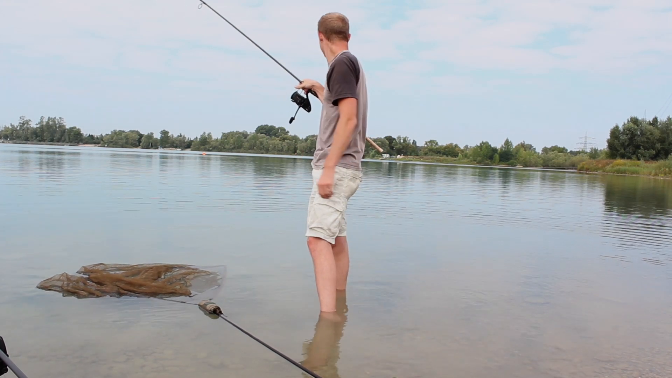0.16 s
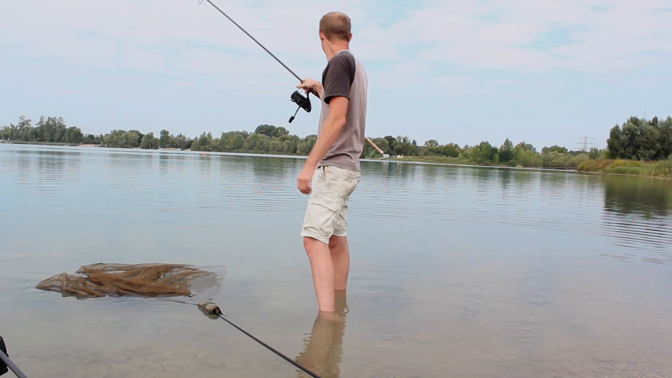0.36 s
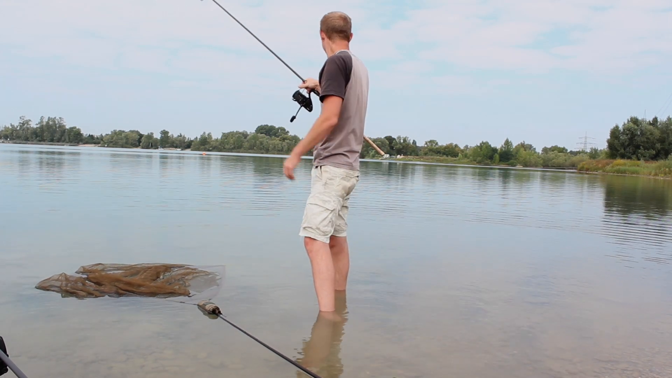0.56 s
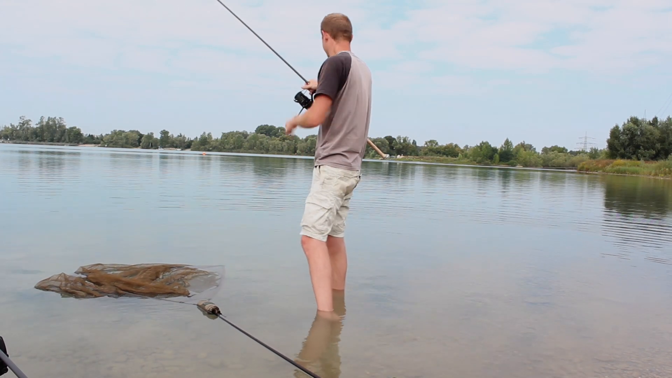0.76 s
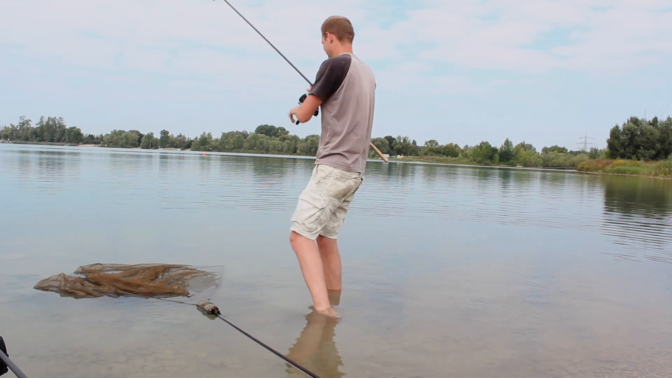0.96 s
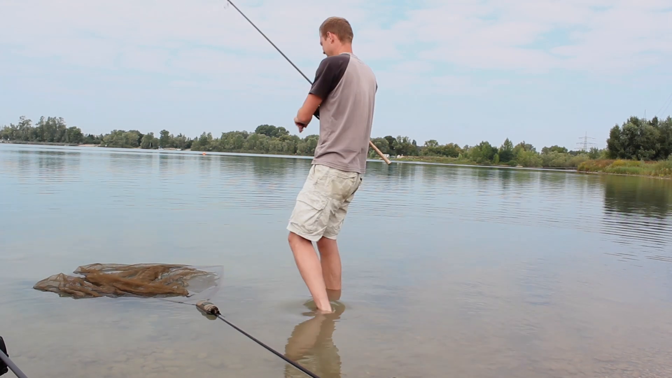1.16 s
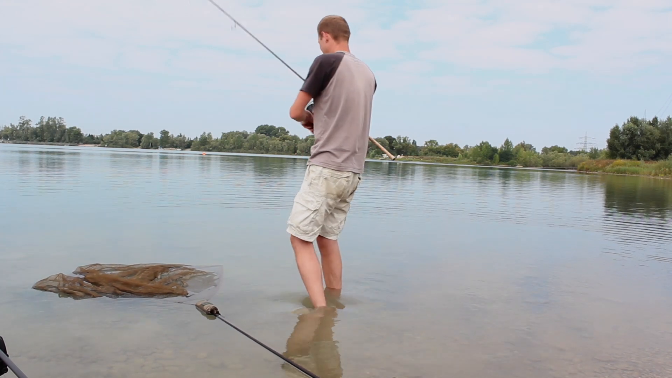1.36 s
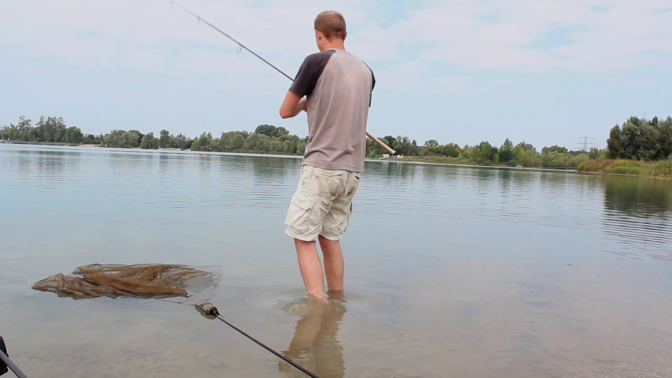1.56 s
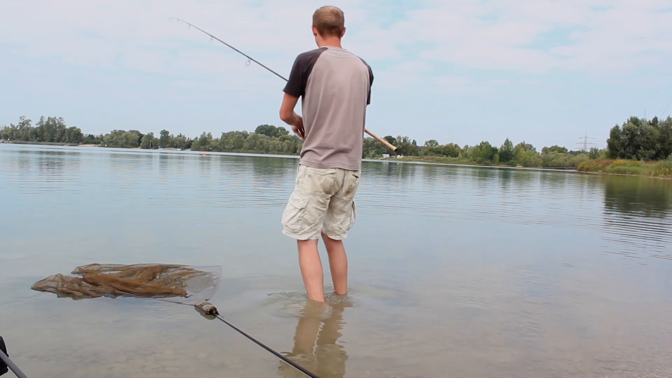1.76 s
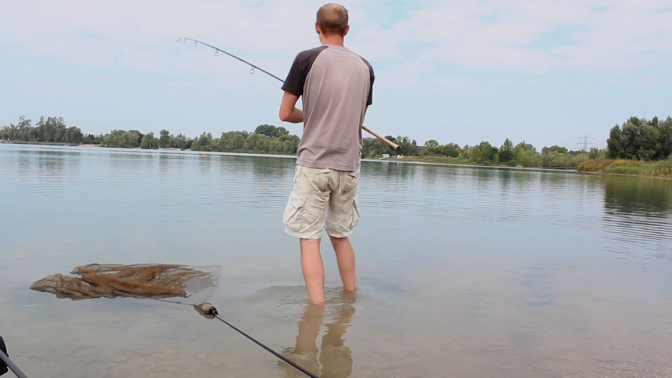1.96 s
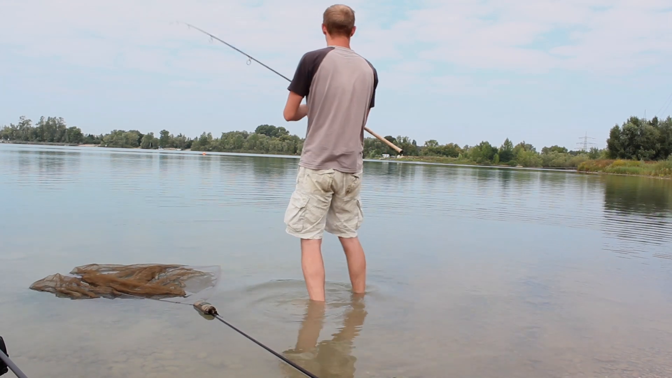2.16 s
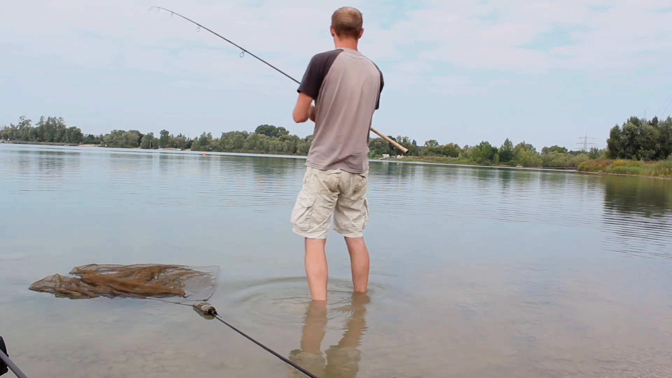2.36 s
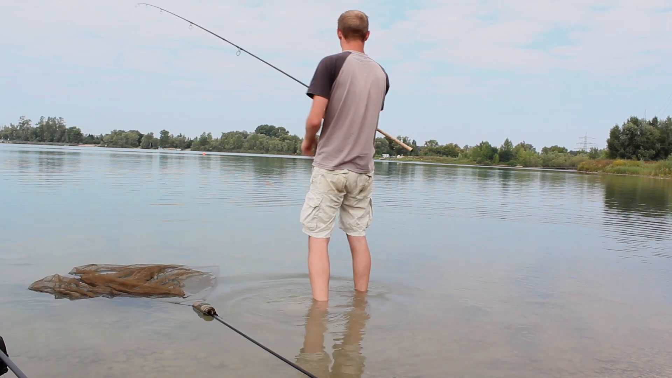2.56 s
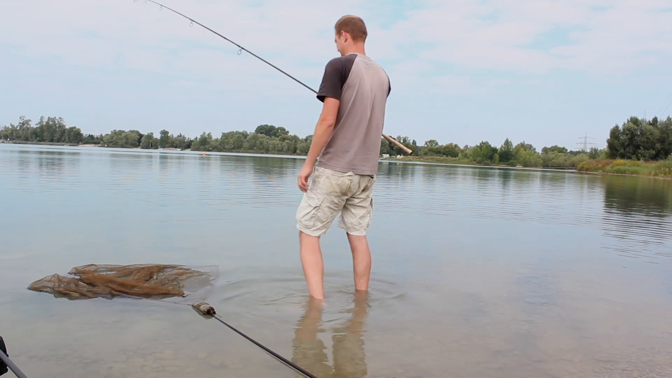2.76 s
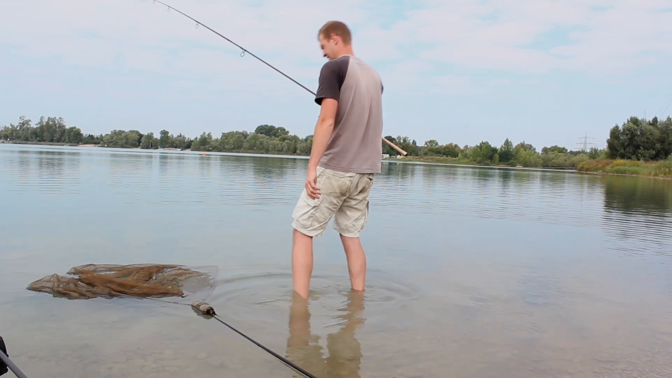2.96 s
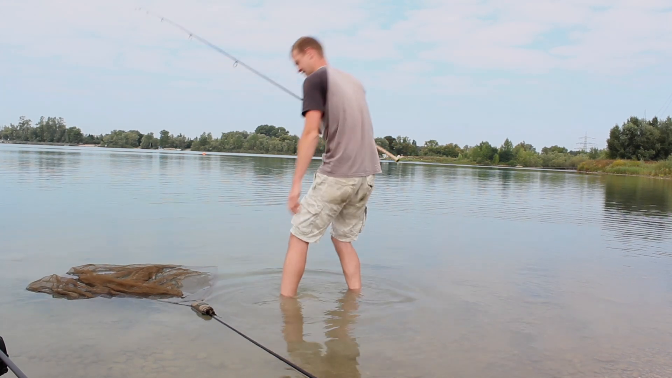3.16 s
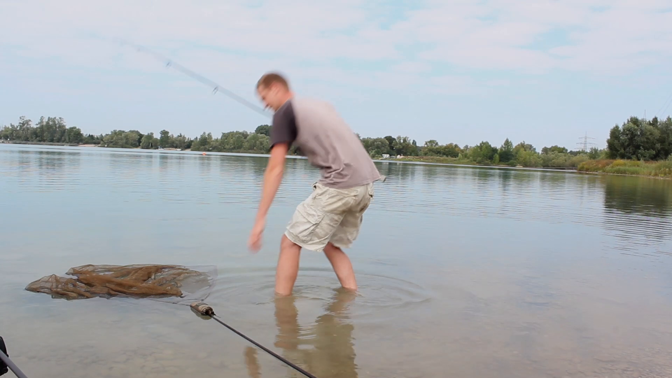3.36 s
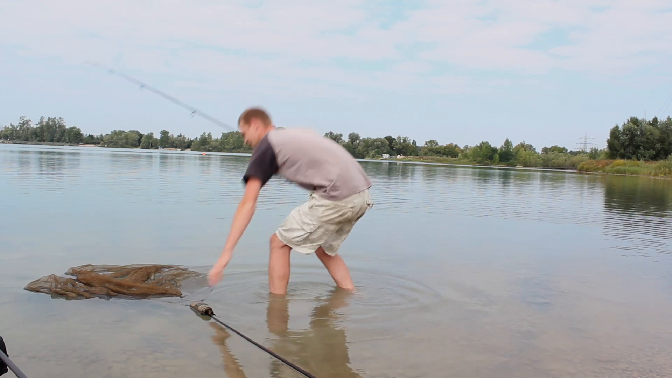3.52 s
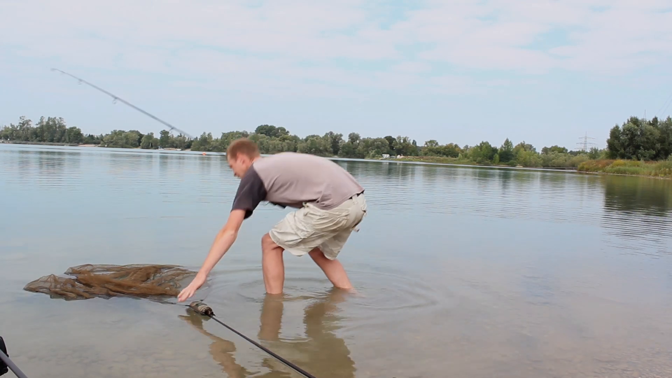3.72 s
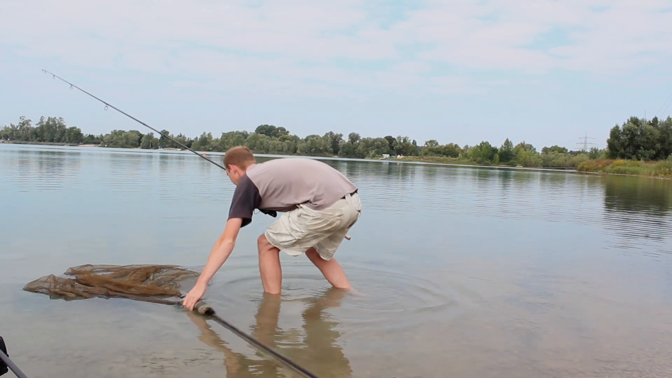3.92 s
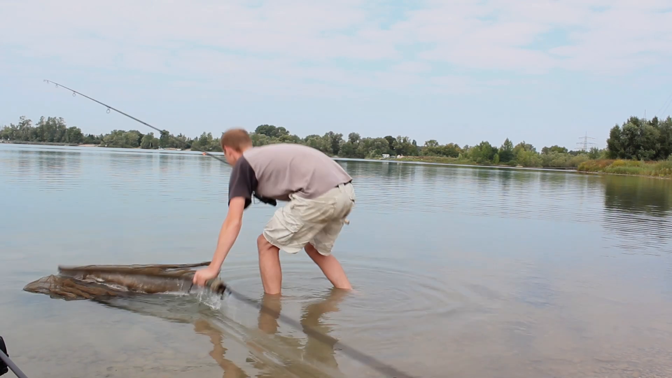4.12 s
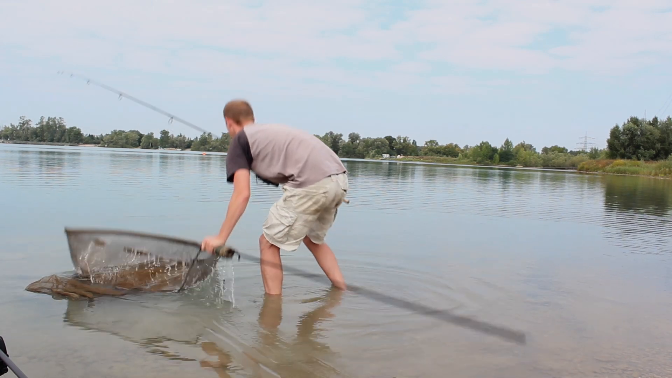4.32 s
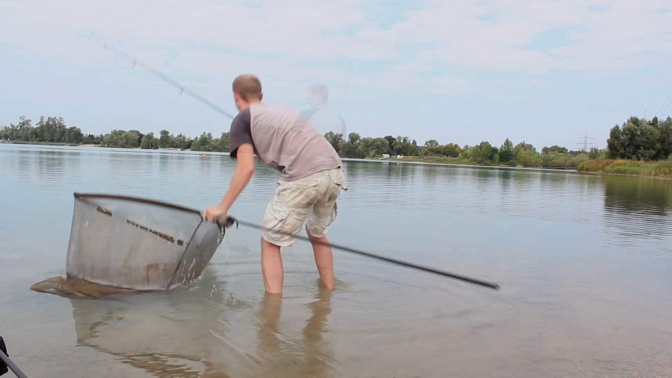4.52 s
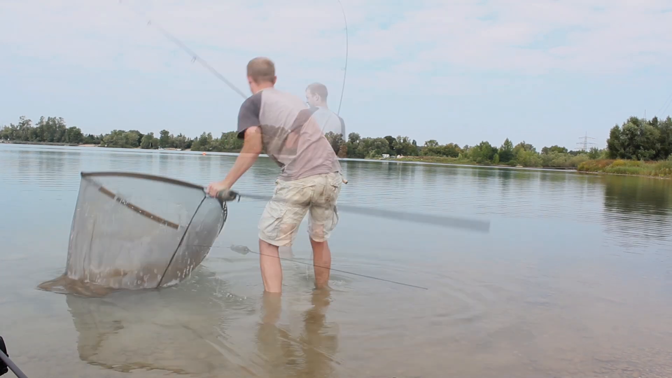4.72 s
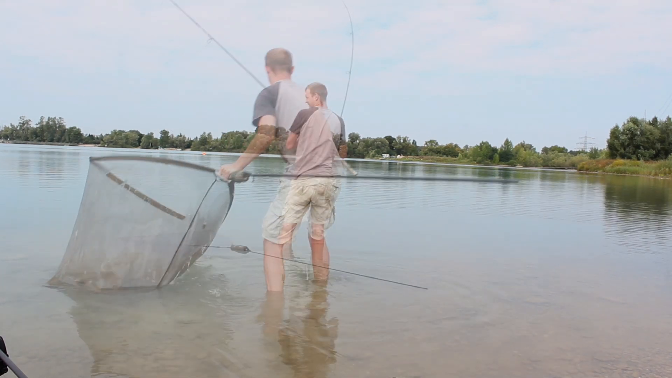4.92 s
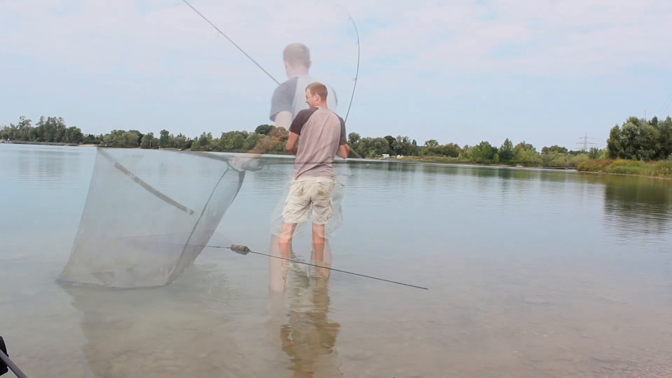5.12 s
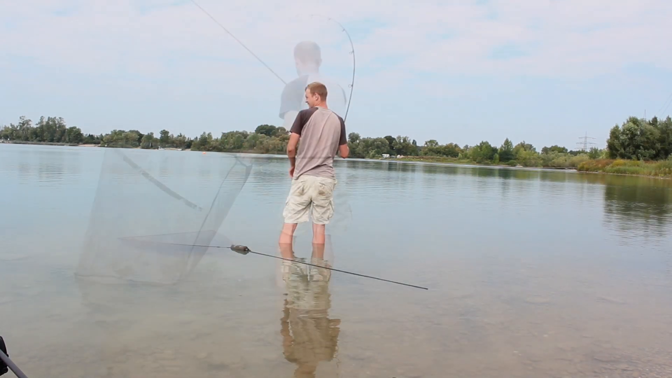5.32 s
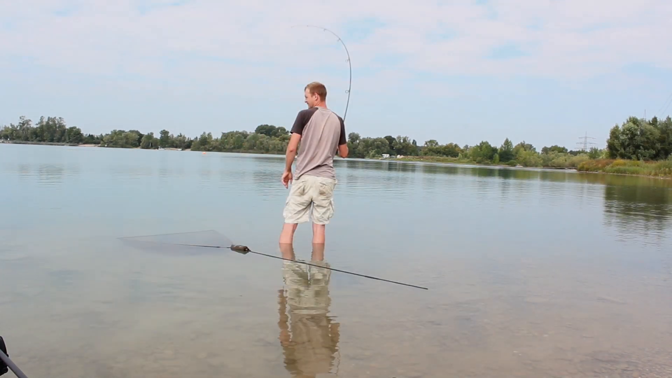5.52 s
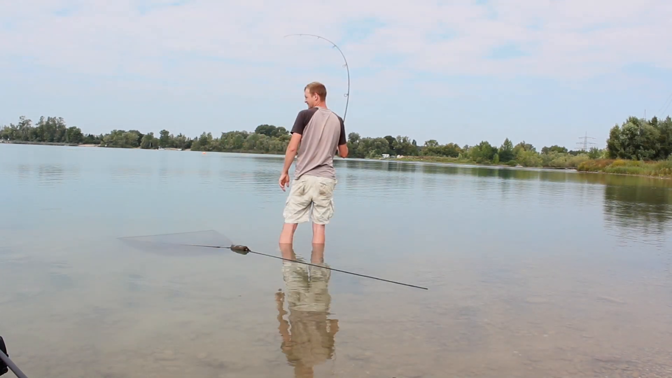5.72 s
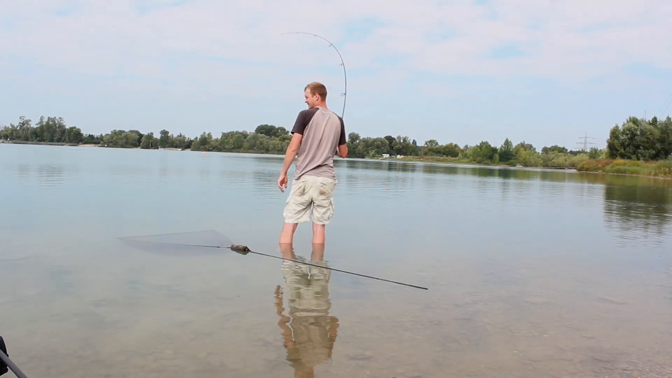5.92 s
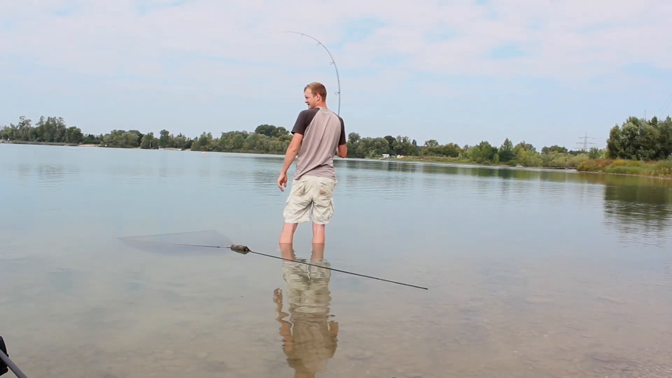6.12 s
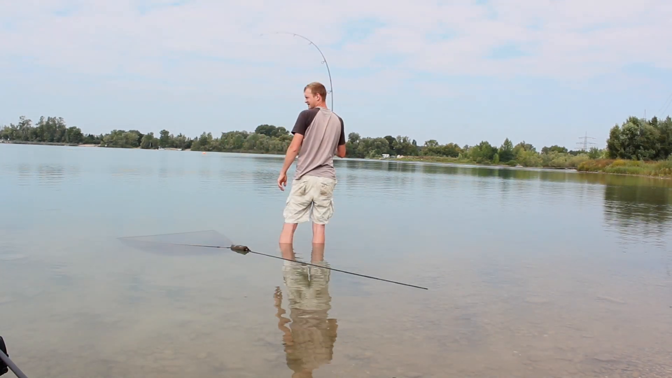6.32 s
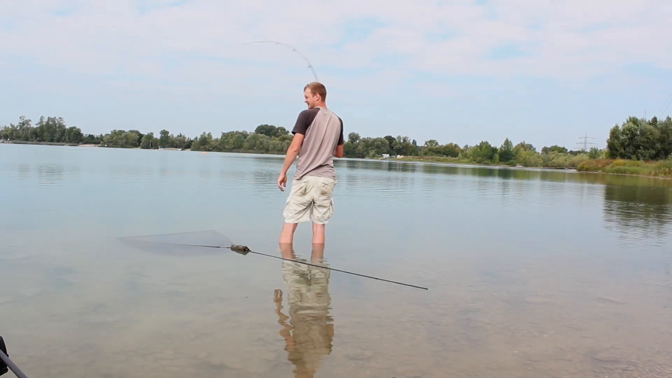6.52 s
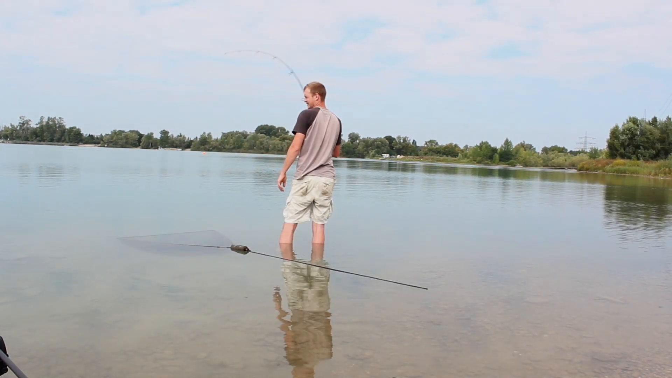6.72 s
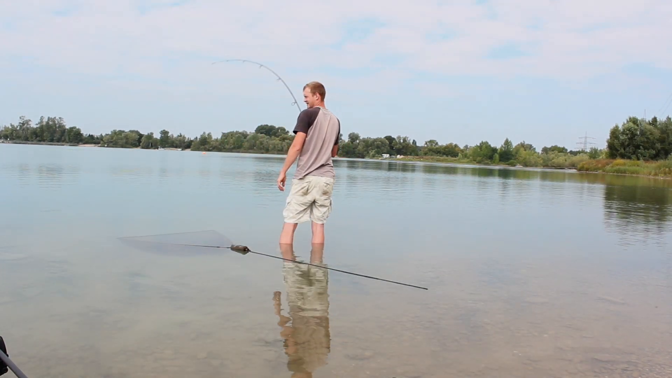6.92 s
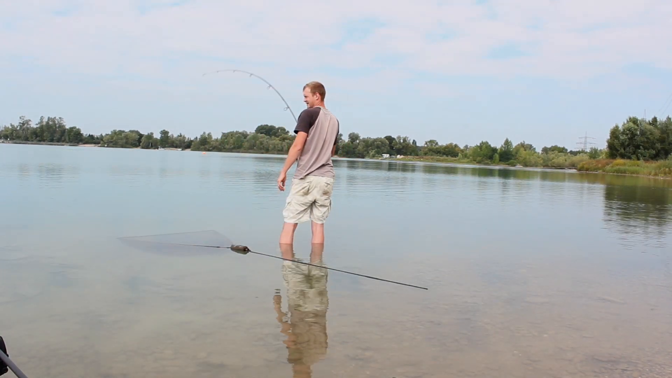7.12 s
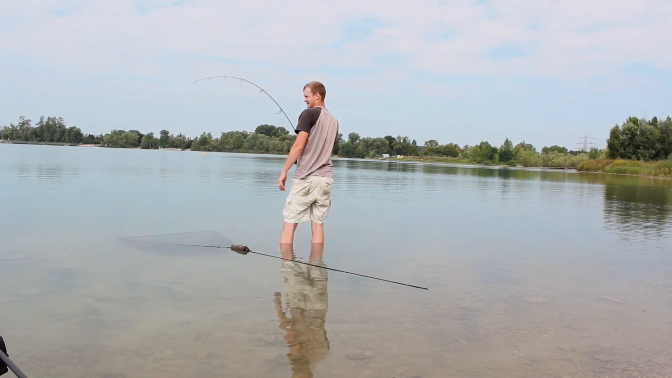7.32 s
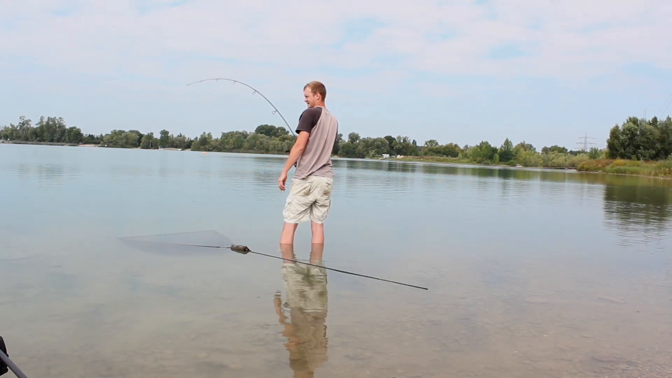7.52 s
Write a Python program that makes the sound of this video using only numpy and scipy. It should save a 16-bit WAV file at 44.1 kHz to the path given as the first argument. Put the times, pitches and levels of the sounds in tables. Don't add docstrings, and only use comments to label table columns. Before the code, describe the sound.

Quiet lakeside wading, gentle bubbly steps, a sudden popping splash as a net is pulled up, draining drips, then gusty wind and a last light step.

```python
import sys
import numpy as np
from scipy import signal
from scipy.io import wavfile
from scipy.ndimage import uniform_filter1d, minimum_filter1d

SR = 44100
rng = np.random.default_rng(int(sys.argv[2]) if len(sys.argv) > 2 else 0)


def persist_wave(psi):
    counts = np.round(np.clip(psi, -1, 1) * 32767).astype(np.int16)
    wavfile.write(sys.argv[1], SR, np.atleast_2d(counts).T)


def voltage_ratio(level):
    return 10 ** (np.asarray(level, float) / 20)


N = 338280


def evened(x):
    return x / np.sqrt(np.mean(x ** 2) + 1e-20)


def over_time(points):
    return np.interp(np.arange(N) / SR, *np.transpose(points))


def read(points, hz):
    f, value = np.transpose(points)
    return np.interp(np.log(hz + 1), np.log(f + 1), value)


def add(mix, s, sound):
    part = mix[round(s * SR):][:len(sound)]
    part += sound[:len(part)]


def noise(spectrum, size, patchy_db):
    real, imag, patches = rng.standard_normal((4 * N // size + 5, size // 2 + 1, 3)).T
    patches = uniform_filter1d(patches, size=8, axis=0)
    patches = evened(uniform_filter1d(patches, size=8, axis=1))
    level_db = read(spectrum, np.fft.rfftfreq(size, 1 / SR))[:, None] + patchy_db * patches
    spectra = (real + 1j * imag) * voltage_ratio(level_db)
    return evened(signal.istft(spectra, nperseg=size, noverlap=3 * size // 4)[1][:N])


def bubble(hz, db, t60_ms, glide, rise_ms):
    rise, t60 = max(rise_ms, 0.05) / 1000, max(t60_ms, 1) / 1000
    t = np.arange(0, rise + t60, 1 / SR)
    shake_hz = rng.uniform([60, 150], [150, 300])
    level_shake, pitch_shake = np.sin(2 * np.pi * (shake_hz * t[:, None] + rng.random(2))).T
    swell = np.sin(np.pi / 2 * np.minimum(t / rise, 1)) ** 2
    decay = voltage_ratio(db - 60 * np.maximum(t - rise, 0) / t60)
    pitch = hz * 2 ** (glide * t) * (1 + 0.018 * pitch_shake)
    pitch = np.minimum(pitch, 0.33 * SR)
    return swell * decay * voltage_ratio(2.0 * level_shake) * np.sin(2 * np.pi * np.cumsum(pitch) / SR)


def slap(db, hz, t60_ms, octaves):
    t = np.arange(round(min(t60_ms + 10, 90) * SR / 1000)) / SR
    foam = rng.standard_normal(len(t)) * voltage_ratio(1.5 - 60 * 1000 * t / t60_ms)
    front = 1.7 * bubble(1.63 * hz, db=0, t60_ms=2.66, glide=-300, rise_ms=0.186)
    add(foam, 0, front)
    band = 0.56 * hz * 2.0 ** np.array([-octaves, octaves])
    return voltage_ratio(db) * signal.lfilter(*signal.butter(3, band, "bandpass", fs=SR), foam)


def smack():
    # start in seconds, start pitch in Hz, peak in dB, t60 in ms, glide in octaves per s.
    modes = [
        (4.0265, 2600, 6.5, 2.2, -250),
        (4.0286, 3800, -16, 7, 0),
        (4.0294, 1820, 1.5, 5, -60),
        (4.0311, 980, -7.5, 14, 0),
        (4.0331, 1750, -9, 16, -90),
        (4.0358, 820, -11.5, 30, 20),
        (4.0392, 1050, -15, 48, 14),
        (4.0305, 590, -21, 24, 0),
    ]
    out = np.zeros(N)
    for i, (s, *mode) in enumerate(modes):
        add(out, s, bubble(*mode, rise_ms=1.45 if i else 0.13))
    return out


def foam_slaps():
    # start in seconds, peak in dB, reference pitch in Hz (the foam band centres at 0.56 times it, the
    # front rings at 1.63 times it), t60 in ms.
    slaps = [(3.857, -25, 5800, 11), (3.952, -20, 2560, 73), (3.9916, -18, 3300, 58),
             (4.0275, -14, 3400, 60), (4.232, -33, 4000, 28), (4.253, -27.5, 3660, 29),
             (4.39, -31, 4000, 20), (4.418, -24.5, 4530, 11.7), (4.458, -37, 2770, 21),
             (4.474, -38.5, 4000, 25), (6.225, -43.5, 2860, 340)]
    out = np.zeros(N)
    for s, *row in slaps:
        add(out, s, slap(*row, octaves=1.05))
    return out


def spray_ticks():
    # start in seconds, peak in dB, centre in Hz.
    ticks = [(1.7421, -47.5, 7150), (1.7458, -33, 9210), (3.1008, -33, 11100), (3.8564, -30, 9680),
             (3.8687, -23, 10200), (3.8757, -27, 8240), (4.0257, -14, 8200), (4.119, -25, 9490),
             (4.2544, -32, 9750), (4.3088, -33.5, 12700), (4.4605, -38, 10900), (4.4719, -28, 8770),
             (4.524, -35, 7030), (4.5717, -32, 8370), (4.635, -27, 12100), (4.8044, -29.5, 7030),
             (4.8221, -29, 12100), (4.8521, -32, 7810), (4.8905, -35.5, 8850), (6.2374, -33.5, 11800)]
    out = np.zeros(N)
    for s, db, hz in ticks:
        add(out, s + 0.00064, bubble(1.02 * hz, db - 0.5, t60_ms=1.55, glide=-78, rise_ms=0.048))
    return out


def air_pockets():
    # start in seconds, start pitch in Hz, peak in dB, t60 in ms, glide in octaves per s.
    pockets = [(1.376, 1193, -39, 120, -2.5), (1.401, 1037, -38, 90, -1.5), (1.454, 800, -39.5, 96, 7.5),
               (1.515, 913, -30.5, 47.4, 11), (1.81, 835, -44, 240, 9.5), (2.174, 460, -46, 250, 11.5),
               (3.063, 656, -37.5, 150, -3.5), (3.158, 613, -39.5, 83, 9), (3.199, 724, -39.5, 143, 11),
               (3.341, 2740, -41, 13.4, -30), (3.169, 2500, -40, 40, 55), (3.876, 480, -35, 56, -1.5),
               (3.887, 1700, -35.5, 86, 3), (3.909, 2510, -18, 27.8, 1.5), (4.0162, 2920, -35, 50, 25),
               (4.178, 539, -33, 140, 21.5), (4.197, 725, -27.5, 100, 18.5), (4.39, 1232, -34, 62, 0.5),
               (4.5, 1400, -29, 38, 10.5), (4.551, 1173, -37, 110, 8), (4.763, 1057, -32.5, 32, 10.5),
               (4.789, 390, -38, 145, 17), (4.9, 950, -34.5, 60, 15.5), (4.715, 1546, -38, 65, 2.5),
               (4.98, 949, -40.5, 81, 0), (5.208, 716, -45, 88, 7), (6.319, 830, -39, 130, 8),
               (4.253, 1080, -36.5, 60, 5), (6.532, 1082, -42.5, 80, -6), (6.612, 974, -43, 140, 6),
               (7.078, 1000, -42, 74, 27)]
    out = np.zeros(N)
    for s, hz, db, t60_ms, glide in pockets:
        add(out, s, bubble(hz, db, t60_ms, glide, rise_ms=0.206 + 0.04 * t60_ms))
    return out


def small_bubbles():
    # start in seconds, start pitch in Hz, peak in dB, t60 in ms, glide in octaves per s.
    leg_pings = [(1.1908, 2300, -39.5, 12, -34.5), (1.3633, 4390, -44, 8, 103),
                 (1.386, 1284, -41, 70, -19.5), (1.396, 4540, -41, 8, 50), (1.416, 5143, -30.5, 12, 35),
                 (1.4235, 2460, -40, 8, 100), (1.4367, 4700, -42, 8, -200), (1.4466, 2220, -31, 25, -21),
                 (1.4476, 2920, -39, 8, 0), (1.4577, 2080, -39.5, 24, 58), (1.4588, 4270, -48, 76, -23),
                 (1.483, 1870, -35, 44, -12), (1.4844, 5030, -41.5, 15.2, -71),
                 (1.5139, 4540, -44, 14, -36), (1.5259, 2010, -36, 24, 29.5), (1.5262, 1530, -44, 24, 17),
                 (1.5309, 3340, -43, 14, 57), (1.5517, 3350, -37.5, 8, -200), (1.5531, 2630, -30.5, 14, 58),
                 (1.5782, 6620, -43, 8, 0), (1.6003, 1810, -37, 42.6, 2), (1.6099, 1750, -42, 24, 0.5),
                 (1.6107, 3700, -35, 8, -125), (1.6218, 3230, -45, 24, 17), (1.6316, 3700, -39.5, 15, -71),
                 (1.6381, 1546, -34, 13.2, -114), (1.6653, 3580, -44, 24, -21), (1.6759, 2920, -39, 8, 175),
                 (1.6969, 1920, -36, 7, 98), (1.8337, 4100, -45, 14, 29), (1.8626, 4240, -41, 8, 50),
                 (1.884, 3460, -42, 8.7, -125), (1.9326, 1560, -34.5, 38, 9.5),
                 (1.9696, 4100, -41.5, 8, 102), (2.0881, 2632, -39.5, 40, -13), (2.1743, 5230, -33, 7.1, 0),
                 (2.1749, 3570, -30.5, 10, -1), (2.1939, 3960, -42, 8, -1), (2.2327, 2296, -42.5, 24, 0.5)]
    net_pings = [(3.9518, 1320, -24.5, 14.7, -72.5), (3.9515, 3000, -27, 8, -200),
                 (3.9519, 3970, -20, 6.5, 0), (3.9548, 2310, -29, 8, 400), (3.9904, 2080, -31, 36, 57),
                 (3.9907, 3200, -26, 23, 91), (3.9902, 4720, -25.5, 6.7, -125),
                 (3.9914, 1525, -30, 40, 52.5), (4.073, 1380, -21, 7.3, 100), (4.0831, 1640, -30.5, 40, 8),
                 (4.0919, 3120, -24.5, 6.8, 0), (4.178, 3960, -36, 24, 0), (4.1841, 1690, -38.5, 70, 21),
                 (4.2198, 3120, -36, 14, -71), (4.2273, 2460, -44, 70, 30.5), (4.2314, 3700, -34, 8, 100),
                 (4.2314, 5570, -35, 8, 0), (4.2521, 3230, -27.5, 8, -200), (4.2521, 5420, -31, 7.5, 50),
                 (4.2552, 4100, -29, 8, 175), (4.2727, 2460, -37, 30.5, -43.5),
                 (4.2776, 6600, -39, 8, -125), (4.2851, 4240, -35, 8, -200), (4.3195, 1580, -31, 6.7, 400),
                 (4.3402, 3340, -34, 14, -36), (4.3522, 4070, -39, 12, -114), (4.3731, 3340, -36, 8, 100),
                 (4.3892, 5530, -36, 8, 50), (4.3894, 2640, -31, 8, 0), (4.4021, 5380, -41.5, 40, -40),
                 (4.4048, 2980, -19.5, 7.4, -200), (4.4062, 3927, -32, 44, -28),
                 (4.4083, 5200, -37, 14, -36), (4.4177, 2360, -31, 7.3, 400), (4.4178, 3800, -25, 8, 0),
                 (4.418, 5200, -26, 8, -125), (4.4501, 2730, -46.5, 110, -8)]
    drain_pings = [(4.4553, 2194, -34.5, 75, 44.5), (4.4592, 3120, -35, 8, 100),
                   (4.4711, 2740, -32, 22, -65), (4.4717, 5170, -34, 14, -71), (4.4724, 6610, -29, 8, -200),
                   (4.4759, 3830, -29.5, 8, -62), (4.4997, 1370, -28, 24, 19), (4.5002, 3580, -35, 8, 98),
                   (4.506, 2520, -31, 14, 0), (4.5243, 6600, -28.5, 8, -64), (4.525, 3700, -37, 8, 400),
                   (4.5428, 3070, -36, 40, -24), (4.5527, 5090, -41, 42, -39), (4.5537, 2160, -35, 28, 90),
                   (4.555, 2950, -20.5, 13, -40), (4.5609, 5030, -35, 24, -21),
                   (4.5735, 3020, -42.5, 40, 19), (4.5871, 3030, -27, 7.4, -62),
                   (4.6625, 3460, -33.5, 14, -36), (4.6973, 3580, -35.5, 14, -114),
                   (4.7383, 2380, -32, 13.2, 157), (4.7633, 1796, -32.5, 14, -36),
                   (4.7772, 2920, -33, 16.7, 29), (4.7986, 2300, -29, 6.1, 175), (4.818, 4700, -31.5, 8, 0),
                   (4.818, 6400, -29, 8, -125), (4.8306, 5030, -35.5, 8, -200),
                   (4.8354, 3100, -34, 24, 13.5), (4.8565, 3120, -34, 8, 175),
                   (4.8565, 4700, -28.5, 7.3, -125), (4.8905, 4240, -37, 14, -114),
                   (4.8912, 3160, -35, 18, -71), (4.9694, 1530, -43, 37, 2), (4.9694, 3700, -42, 8, 50),
                   (4.9997, 4240, -35.5, 15.9, -71), (5.0173, 3820, -41.5, 26, -19.5),
                   (5.0367, 3700, -41, 8, 400), (5.0527, 3700, -43, 14, -36), (5.098, 1530, -35, 13, -114),
                   (5.118, 2110, -41.5, 14, -20), (5.1595, 3400, -35, 9, 175)]
    scattered_pings = [(2.9973, 3784, -44.5, 15, -36), (3.0952, 3830, -41, 7.4, 0), (3.101, 3040, -36, 8.8, -62),
                       (3.1146, 1880, -45, 40, 10), (3.1497, 2135, -45.5, 40, -11), (3.1568, 3120, -41, 8, -125),
                       (3.1639, 4100, -49, 24, -67), (3.1656, 2700, -32, 7.2, 0), (3.166, 5380, -38.5, 24, -21),
                       (3.1772, 3120, -46.5, 14, 157), (3.198, 3580, -39.5, 14, 0), (3.198, 4700, -43, 8, 50),
                       (3.2364, 3120, -42, 14, -71), (3.3476, 2370, -40.5, 40, -0.5),
                       (6.2194, 2715, -49.5, 40, 39), (6.2214, 5380, -48.5, 24, -20),
                       (6.2218, 3470, -44.5, 14, 29), (6.2299, 2820, -45, 24, -42), (6.2361, 2380, -39, 24, 17),
                       (6.2378, 6600, -45, 8, 0), (6.2439, 2380, -34, 36, 19), (6.2439, 5200, -37, 14, 29),
                       (6.2446, 3200, -44, 36, 12), (6.2531, 3020, -35, 14, 29), (6.2537, 1570, -45, 24, 33),
                       (6.2622, 2080, -39, 7.7, 50), (6.4235, 2080, -45, 60, -8),
                       (6.518, 2540, -33.5, 25.8, -40), (6.5279, 1630, -40, 14, -114),
                       (6.582, 3900, -44.5, 40, -50), (6.6599, 3120, -41, 16, -114),
                       (6.6612, 1294, -46.5, 110, -5.5), (6.9415, 3580, -47.5, 24, -21),
                       (6.9609, 2804, -47.5, 65, -8), (7.0435, 2380, -45, 44, -10.5),
                       (7.0466, 4000, -49, 120, -15), (7.0558, 2460, -41, 13, 29),
                       (7.0595, 3353, -44, 45, -42.5), (7.1207, 4390, -44.5, 8, 50), (7.135, 2640, -44, 24, 0),
                       (1.7452, 2890, -46.5, 14, 157), (1.8113, 3640, -47.5, 24, -43.5),
                   (1.8816, 2130, -47.5, 40, 20), (1.918, 4800, -47.5, 14, -36),
                   (2.0721, 1990, -46, 24, 15), (2.0728, 4640, -49, 24, -22),
                   (3.2429, 4340, -47.5, 14, -114), (3.2571, 2280, -44, 14, 29), (6.28, 4060, -50, 24, -21),
                   (6.2984, 3660, -48, 14, 29), (6.3715, 1997, -49.5, 75, 6), (6.4001, 2700, -45, 24, -21),
                   (6.4895, 3410, -48, 14, -71), (6.5926, 2360, -48, 40, -25.5),
                   (6.6208, 5500, -49, 14, 29), (6.7337, 3200, -52, 40, 1), (6.7636, 2360, -43, 15, 57),
                   (6.8327, 3310, -49, 24, 0), (6.899, 3200, -47.5, 15, 28.5), (6.9884, 4490, -51, 14, -36),
                   (7.0003, 2800, -45, 14, -73), (7.2768, 4340, -49, 15, -114)]
    out = np.zeros(N)
    for s, hz, db, t60_ms, glide in leg_pings + net_pings + drain_pings + scattered_pings:
        rise_ms = 0.206 + 0.0935 * t60_ms
        add(out, s, bubble(hz, db, t60_ms, glide, rise_ms))
        add(out, s, slap(db - 3.5, 1.55 * hz, t60_ms=43, octaves=0.446))
    return out


def stirred(column):
    # time in seconds, force in dB, depth from 0 (spray) to 1 (deep gurgle).
    movements = [
        [(0, -63.5, 1), (.35, -62.5, 0.23), (.6, -70, 1)],
        [(1.1, -66, .1), (1.35, -55.5, 0.56), (1.65, -52.5, 0.66), (1.95, -56.5, 0.58), (2.35, -66.5, 0.3)],
        [(2.95, -65.5, 1), (3.19, -58.5, 0.87), (3.4, -58, .6)],
        [(3.8, -50, 0.1), (3.95, -48.5, 0.6), (4.1, -44, 0.73), (4.24, -46, 0.31), (4.48, -42, 0.23),
         (4.62, -43, 0.66), (4.84, -44.5, 0.63), (5.12, -56.5, 0.59), (5.35, -57.5, 0.5)],
        [(6.15, -73, 0.2), (6.26, -52, 0.4), (6.34, -60.5, 0.69), (6.6, -56.5, 0.55), (6.8, -66, 0.6),
         (7.03, -56, 0.5), (7.25, -72.5, 0.45)],
    ]
    # level in dB at middle force and depth, dB per dB of force, dB over the whole depth.
    answers = [
        (-58.5, 1.0883, 21.5),
        (-58, 1.08, -5.5),
        (-66, 0.53, -12),
        (-66, 1.38, 0),
        (-61.5, 0.68, -13.5),
    ]
    middle_db, slope, depth_db = answers[column]
    gain, t = np.zeros(N), np.arange(N) / SR
    for rows in movements:
        s, force_db, depth = np.transpose(rows)
        db = middle_db + slope * (force_db + 55) + depth_db * (depth - 0.5)
        inside = (t > s[0]) & (t < s[-1])
        gain[inside] = voltage_ratio(np.interp(t[inside], s, db)) * signal.windows.tukey(inside.sum(), 0.1)
    return gain


def swarm(column, spread_db):
    # lowest pitch in Hz, highest pitch in Hz, ring in cycles, bubbles per s.
    swarms = [
        (433, 1716, 9, 1300),
        (1400, 5500, 10.97, 1700),
        (4870, 14500, 2.1, 1500),
    ]
    low_hz, high_hz, cycles, per_s = swarms[column]
    strength = voltage_ratio(spread_db * np.minimum(rng.exponential(1, N), 4))
    strength *= rng.random(N) < per_s / SR
    kind, out = rng.integers(0, 14, N), np.zeros(N)
    for k, hz in enumerate(np.geomspace(low_hz, high_hz, 14)):
        ring_ms = 1000 * cycles * rng.uniform(1, 4.7) / hz
        ring = bubble(hz, 0, ring_ms, glide=300 / ring_ms, rise_ms=0.0552 * ring_ms)
        ring = evened(ring) / np.sqrt(ring_ms)
        ring *= np.sin(np.pi * (k + 1.8) / 17)
        out += signal.oaconvolve(strength * (kind == k), ring)[:N]
    return evened(out) * stirred(column)


def draining_sheet():
    # frequency in Hz, level in dB per Hz.
    sheet = [(200, -35), (400, 10), (900, -10), (1800, 0), (3500, -1), (6000, -12.5), (10000, -20)]
    return stirred(column=3) * noise(sheet, size=512, patchy_db=5.0)


def droplets():
    drops_per_s = 220
    strength = voltage_ratio(3.0 * np.minimum(rng.exponential(1, N), 3))
    strength *= rng.random(N) < drops_per_s / SR
    kind, out = rng.integers(0, 8, N), np.zeros(N)
    for k, hz in enumerate(np.geomspace(3200, 15000, 8)):
        splat = slap(0, hz, t60_ms=8, octaves=0.35)
        out += signal.oaconvolve(strength * (kind == k), splat)[:N]
    return evened(out) * stirred(column=4)


def water():
    placed = smack() + foam_slaps() + spray_ticks() + air_pockets() + small_bubbles()
    swarms = swarm(column=0, spread_db=2.5) + swarm(column=1, spread_db=3.5) + swarm(column=2, spread_db=2.0)
    return placed + swarms + draining_sheet() + droplets()


def wind():
    # time in seconds, gust level in dB.
    gusts = [(0, -42.5), (.06, -65), (3.57, -52), (4.1, -69), (4.68, -49), (4.93, -43), (5.3, -38.5),
             (5.98, -47), (6.39, -42), (6.56, -41.5), (6.75, -43), (6.93, -45.5), (7.0, -41.5), (7.2, -39),
             (7.3, -49), (7.37, -42), (7.62, -44), (7.67, -36)]
    # frequency in Hz, level in dB per Hz.
    buffeting = [(3, 4), (8, 10), (30, 0), (70, -0.5), (110, -9), (200, -21), (350, -35), (600, -57.5)]
    return noise(buffeting, size=2048, patchy_db=2.0) * voltage_ratio(6.0 + over_time(gusts))


def second_take():
    dissolve = [4.54, 5.44]
    return np.interp(np.arange(N) / SR, dissolve, [0, 1])


def road_wash():
    # frequency in Hz, level in dB per Hz.
    wash = [(45, -25), (70, -26), (120, -5.5), (200, -8), (350, -12), (520, -19), (1000, -14.5),
            (1400, -20), (1950, -28.5), (4000, -35), (6000, -43.5)]
    return voltage_ratio(-48.5) * noise(wash, size=1024, patchy_db=1.43)


def engine():
    # time in seconds, firing rate in Hz.
    firing = [(0, 56.53), (2, 58.75), (3.5, 59.72), (4.3, 54.4), (5.5, 55.3)]
    order_db = [-54, -59]
    turns = np.cumsum(over_time(firing)) / SR
    out = np.zeros(N)
    for order, db in enumerate(order_db, 1):
        out += voltage_ratio(db) * np.sin(2 * np.pi * order * turns)
    return (1 - second_take()) * out


def mains_hum():
    return voltage_ratio(-25) * np.cos(2 * np.pi * 49.984 * np.arange(N) / SR)


def amplifier_hiss():
    # frequency in Hz, level in dB per Hz.
    hiss = [(90, -40.5), (200, -1), (400, 2.5), (1000, 0), (4000, 0.5), (12000, -1.5), (20000, -4)]
    return voltage_ratio(-52.5) * np.array([noise(hiss, size=1024, patchy_db=-0.1) for _ in range(2)])


def scene():
    thin = np.hypot(second_take(), 1 - second_take())
    air = water() + wind() + thin * road_wash() + engine()
    return air + mains_hum() + thin * amplifier_hiss()


def top_cut(x):
    return signal.sosfilt(signal.butter(12, 15860, fs=SR, output="sos"), x)


def record(dry):
    power = uniform_filter1d((dry ** 2).mean(0), size=441, origin=220)
    power_db = 10 * np.log10(abs(power) + 1e-12)
    held_db = -minimum_filter1d(-power_db, size=2601, origin=1300)
    fall = np.arange(N) * 49.0 / SR
    envelope_db = np.maximum.accumulate(held_db + fall) - fall
    over_db = np.maximum(envelope_db + 13, 0)
    ducked = dry / voltage_ratio(1.06 * uniform_filter1d(over_db, size=301, origin=150))
    finished = np.clip(ducked, -1, 1)
    return top_cut(finished)


dry = scene()
out = record(dry)
persist_wave(out)
```